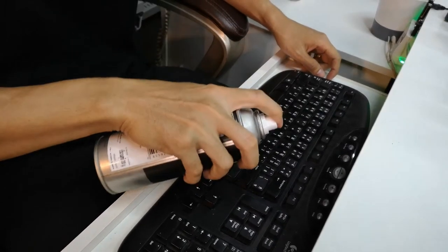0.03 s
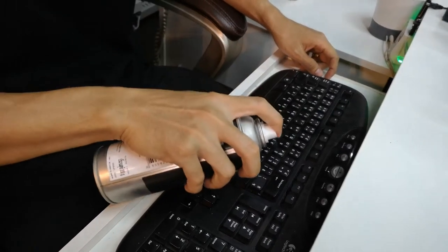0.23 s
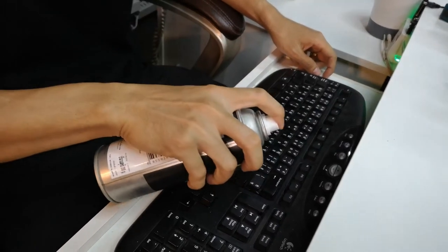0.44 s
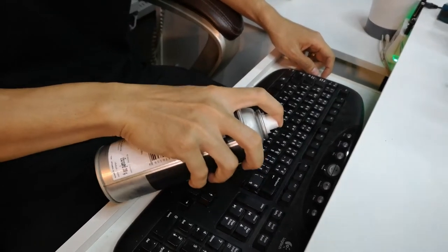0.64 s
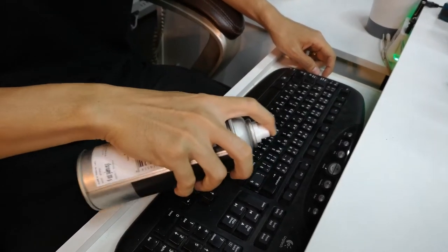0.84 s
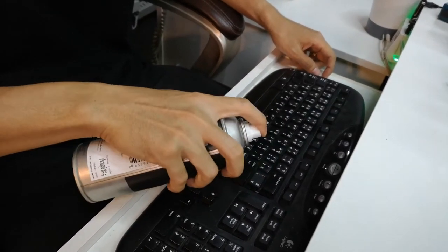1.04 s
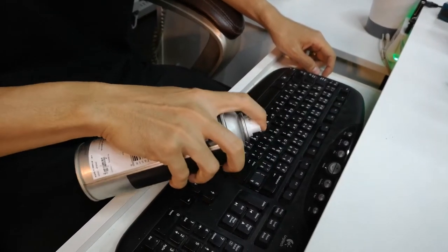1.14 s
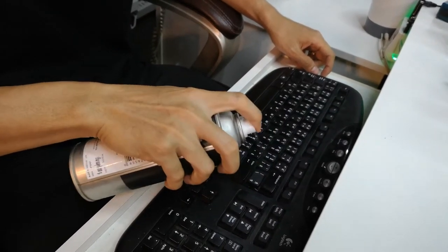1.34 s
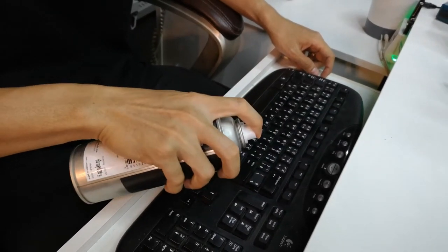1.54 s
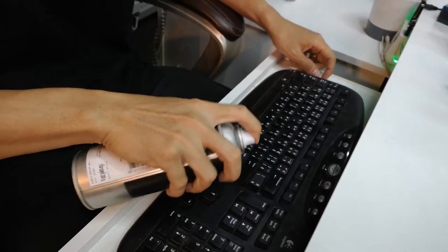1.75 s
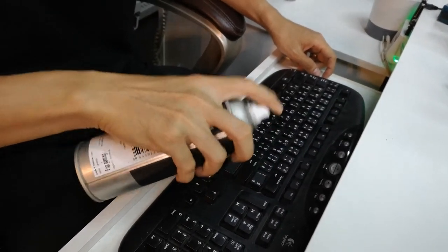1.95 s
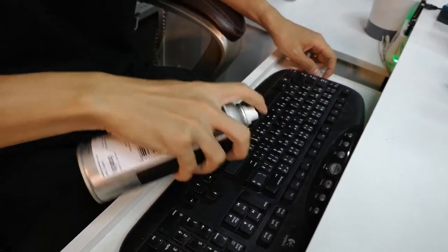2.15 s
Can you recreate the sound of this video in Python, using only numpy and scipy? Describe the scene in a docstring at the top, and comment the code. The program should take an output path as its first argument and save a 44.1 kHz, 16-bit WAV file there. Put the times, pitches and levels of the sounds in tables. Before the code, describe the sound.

A can of compressed air sprays a computer keyboard in two sharp hissing bursts, with a half-second pause between. An arm rustles softly after each one. The microphone is close, in a quiet room with a faint low rumble.

```python
"""Two sharp hissing bursts in a quiet room: a can of compressed air fired at a computer keyboard.
The jet hisses at the nozzle and roars in the gaps between the keys; desk and walls throw it back.
The can rings breathily as the second burst ends; the arm rustles softly after each burst.
Gain control at the close microphone ducks everything, room rumble included, during the bursts."""
import sys
import numpy as np
from scipy import signal
from scipy.fft import rfft, irfft
from scipy.io import wavfile
from scipy.ndimage import uniform_filter1d

SR = 44100
rng = np.random.default_rng(int(sys.argv[2]) if len(sys.argv) > 2 else 0)


def master(y):
    """Save y as 16-bit WAV."""
    cut = np.clip(np.atleast_2d(y).T, -1, 1)
    pcm = np.round(cut * 32767)  # scale
    wavfile.write(sys.argv[1], SR, pcm.astype(np.int16))


N = 97020
TIME, HZ = np.arange(N) / SR, np.fft.rfftfreq(N, 1 / SR)


def amp(db):
    return 10 ** (np.asarray(db) / 20)


def unit_rms(x):
    return x / np.sqrt(np.mean(x ** 2) + 1e-20)


def curve(points, hz, column=1):
    """Table column interpolated over log frequency."""
    table = np.array(points, float)
    return np.interp(np.log(hz + 1), np.log(table[:, 0] + 1), table[:, column])


def noise(gain, channels=1):
    """Noise of rms 1 with the given spectrum."""
    return unit_rms(irfft(rfft(rng.standard_normal((channels, N))) * gain, N))


def smooth(x, lag_s):
    """One-pole lag."""
    pole = np.exp(-1 / (lag_s * SR))
    return signal.lfilter([1 - pole], [1, -pole], x)


def bumps(rows):
    """Envelope of Gaussian bumps."""
    return sum(amp(db) * np.exp(-.5 * ((TIME - at_s) / sigma_s) ** 2) for at_s, sigma_s, db in rows)


def resonance(hz, width_hz):
    return 1 / (1 + (2 * (HZ - hz) / width_hz) ** 2)


def background():
    """Low room rumble, faint fan noise and mains hum."""
    # Each row: frequency in Hz, relative noise density in dB.
    spectrum = [(12, -36), (20, -6), (59, -0.5), (82, -6), (319, -14), (387, -20), (525, -26.5), (914, -19),
                (1140, -21), (2770, -19), (3010, -28.5), (3760, -29.5), (4560, -32), (9110, -31.5),
                (15000, -53.5)]
    # Each row: frequency in Hz, left-right correlation.
    correlation = [(60, 0.98), (180, 1), (550, 0.26), (1650, 0.11), (4970, 0.02), (15000, 0.04)]
    # Each row: frequency in Hz, rms level in dB.
    hum_tones = [(49, -43.5), (98.5, -49.5)]
    left, independent = rfft(rng.standard_normal((2, N)))
    same = curve(correlation, HZ)
    right = same * left + np.sqrt(1 - same ** 2) * independent
    air = irfft(np.array([left, right]) * amp(curve(spectrum, HZ)), N)
    hum = sum(amp(db) * np.sqrt(2) * np.sin(2 * np.pi * (hz * TIME + rng.random()))
              for hz, db in hum_tones)
    return amp(-34) * unit_rms(air) + hum


def rumble_swells():
    """Brief swells of low noise at the microphone."""
    # Each row: centre in seconds, sigma in seconds, level in dB.
    swells = [(.09, 0.024, -33), (.175, 0.02, -37), (1.25, 0.034, -35), (1.58, 0.084, -29.5),
              (2.115, 0.018, -33)]
    # Each row: frequency in Hz, relative noise density in dB.
    spectrum = [(15, -29), (48, 10), (95, -8.5), (170, -13.5), (400, -53), (1500, -80)]
    return bumps(swells) * noise(amp(curve(spectrum, HZ)))


def valve(opens_s, closes_s, rise_s=.014, decay_s=.004):
    """Airflow builds as the valve opens and dies quickly when it shuts."""
    opening = np.clip((TIME - opens_s) / rise_s, 0, 1) ** 2
    return opening * np.exp(-np.maximum(TIME - closes_s, 0) / decay_s)


def jet(roar_low_hz=1245, roar_high_hz=3300, roar_lag_s=.003):
    """Both bursts at one spot: air roars between the keys in one band, the nozzle hisses outside it."""
    # Each row: valve opening in seconds, closing in seconds.
    bursts = [(.205, 0.7543), (1.269, 1.895)]
    # One list per burst. Each row: time in seconds, hiss and roar in relative dB.
    flow = [
        [(0.222,-17.5,-17.5),(0.25,-15,-16),(0.278,-14.5,-19.5),(0.35,-15,-19),(0.433,-16,-21.5),(0.6,-15,-21.5),(0.665,-17,-22.5),(0.75,-16,-22)],
        [(1.29,-20,-20.5),(1.444,-15,-19),(1.506,-15.5,-18),(1.58,-17.5,-21.5),(1.622,-16,-18.5),(1.738,-19,-22.5),(1.81,-17,-15.5),(1.89,-17,-22)],
    ]
    # Jet colour, set by the aim. Each row: frequency in Hz, then relative dB for
    # first burst left, right, second burst left, right.
    jet_spectra = [(201, -50.0, -56, -75, -62), (486, -34, -35, -32, -32.7), (650, -23, -25.5, -23, -24),
                   (1034, -22.5, -21.5, -19.5, -20), (1374, -17, -17.5, -13.5, -13),
                   (1880, -13, -6, -9, -2), (2170, -6, -6.5, -7, -4), (2536, -5.5, -8, -1.5, -6.5),
                   (3140, -10.5, -11.5, -9, -9.5), (4400.0, -11.2, -11.8, -10, -12),
                   (5480, -10.5, -8, -11, -7.5), (7300, -5.7, -6.5, -7.5, -6.5),
                   (8000.0, -5, -19, -2.5, -21), (8930, -6.0, -10.5, -5, -9),
                   (9830, -15, -11.5, -12.7, -11), (10800, -20, -18.5, -19, -18),
                   (15200, -19.5, -19, -18.8, -18)]
    # Hollows under the keys. Each row: frequency in Hz, width in Hz, lift in dB.
    hollows = [(1624, 36, 5.5), (1923, 17, 4.5), (2390, 37, 0.5), (2662, 79, 2.5)]
    hollow_gain = amp(sum(db * resonance(hz, width_hz) for hz, width_hz, db in hollows))
    band = 1 / (1 + (HZ / roar_high_hz) ** 20) * (1 - 1 / (1 + (HZ / roar_low_hz) ** 10))
    air = np.zeros((2, N))
    for burst, (opens_s, closes_s) in enumerate(bursts):
        at_s, hiss_db, roar_db = np.transpose(flow[burst])
        colour = amp([curve(jet_spectra, HZ, column=1 + 2 * burst + side) for side in range(2)])
        hiss = noise(colour * np.sqrt(1 - band)) * amp(5 + np.interp(TIME, at_s, hiss_db))
        roar = noise(colour * hollow_gain * np.sqrt(band)) * amp(5.5 + np.interp(TIME, at_s, roar_db))
        air += hiss * valve(opens_s, closes_s) + roar * valve(opens_s + roar_lag_s, closes_s)
    return air


def desk(x, t60_s=.03, delay_s=.0006):
    """Direct sound at two microphone ports plus quick reflections off keyboard and desk."""
    # Each row: frequency in Hz, direct share of the power from 0 to 1.
    direct_share = [(300, 0.86), (1250, 0.76), (1900, 0.16), (2800, 0.33), (3300, 0.58), (3550, 0.73),
                    (3950, 0.02), (5300, 0.53), (7500, 0.26), (9500, 0.12), (15000, 0.1)]
    # Each row: frequency in Hz, phase lead of the left port in radians.
    port_lead = [(300, 2), (700, 0.83), (1550, -0.5), (2100, 1.53), (2500, 1.9), (2850, 0.84), (3250, 2.5),
                 (3450, 3.5), (3750, 2.5), (3950, 1), (5500, 0.3), (7000, 1.07), (8200, 1.2), (9000, -0.1),
                 (15000, 3.5)]
    taps = rng.standard_normal((2, N)) * (TIME > delay_s) * amp(-60 * TIME / t60_s)
    reflected = rfft(taps / np.linalg.norm(taps, axis=1, keepdims=True))
    direct = np.exp(1j * curve(port_lead, HZ) * np.array([[.5], [-.5]]))
    share = curve(direct_share, HZ)
    paths = np.sqrt(share) * direct + np.sqrt(1 - share) * reflected
    broad_gain = np.sqrt(uniform_filter1d(abs(paths) ** 2, size=1300, axis=1))
    return irfft(rfft(x) * paths / broad_gain, N)  # only the fine ripple colours the sound


def room(x, level_db=-7.5, delay_s=.007):
    """Short diffuse tail off the walls, each band dying at its own rate."""
    # Each row: frequency in Hz, T60 in seconds.
    decay_times = [(300, 0.37), (1000, 0.13), (2400, .36), (6000, 0.26), (14000, 0.27)]
    hz, t, bands = signal.stft(rng.standard_normal((2, SR // 2)), SR, nperseg=256)
    t60_s = curve(decay_times, hz)[:, None]
    tail = signal.istft(bands * amp(-60 * t / t60_s) / np.sqrt(t60_s), SR, nperseg=256)[1]
    tail *= np.arange(tail.shape[1]) / SR > delay_s
    return amp(level_db) * signal.fftconvolve(x, tail / np.linalg.norm(tail[0]), axes=1)[:, :N]


def spray(spots=5, flutter_db=.1, flutter_hz=160):
    """Several spots along the jet, each with its own reflections; turbulence flutters them together."""
    flutter = amp(flutter_db * noise(1 / (1 + (HZ / flutter_hz) ** 2)))
    near = [desk(flutter * jet() + can_ring()) for _ in range(spots)]
    return sum(x + room(x) for x in near) / np.sqrt(spots)


def arm_rustle():
    """The arm moves between the bursts and lifts at the end: soft puffs of bright noise."""
    # Each row: centre in seconds, sigma in seconds, level in dB.
    rustles = [(0.956, 0.07, -44.5), (2.07, 0.04, -42), (2.167, 0.062, -42.5)]
    # Each row: frequency in Hz, relative noise density in dB.
    spectrum = [(300, -35), (2000, 7), (4200, -5), (7500, 3), (11500, -2.5), (15000, -18)]
    return bumps(rustles) * noise(amp(curve(spectrum, HZ)), channels=2)


def can_ring(pan_db=1.5):
    """The can's breathy ring as the valve starts to close: narrow-band noise, stronger on the right."""
    # Each row: centre in seconds, sigma in seconds, level in dB before panning.
    swells = [(1.866, 0.029, -16)]
    return bumps(swells) * noise(resonance(hz=2740, width_hz=350)) * amp([[-pan_db], [pan_db]])


def scene():
    return spray() + background() + arm_rustle() + rumble_swells()


def record(dry):
    """Gain control ducks each burst and recovers; soft peak limiter and low-pass follow."""
    threshold_db, ratio, recovery_db_per_s = -19.5, 2.07, 28
    ceiling, cutoff_hz = .86, 15450
    power_db = 10 * np.log10(smooth((dry ** 2).mean(0), lag_s=.0021) + 1e-12)
    cut_db = np.maximum(power_db - threshold_db, 0) * (1 - 1 / ratio)
    recovery_db = TIME * recovery_db_per_s
    held_db = np.maximum.accumulate(cut_db + recovery_db) - recovery_db
    ducked = dry * amp(-smooth(held_db, lag_s=.022))
    limited = ducked / (1 + (ducked / ceiling) ** 8) ** (1 / 8)
    lowpass = signal.firwin(401, cutoff_hz, window=("kaiser", 9), fs=SR)
    return signal.oaconvolve(limited, lowpass[None], "same")


dry = scene()
out = record(dry)
master(out)
```